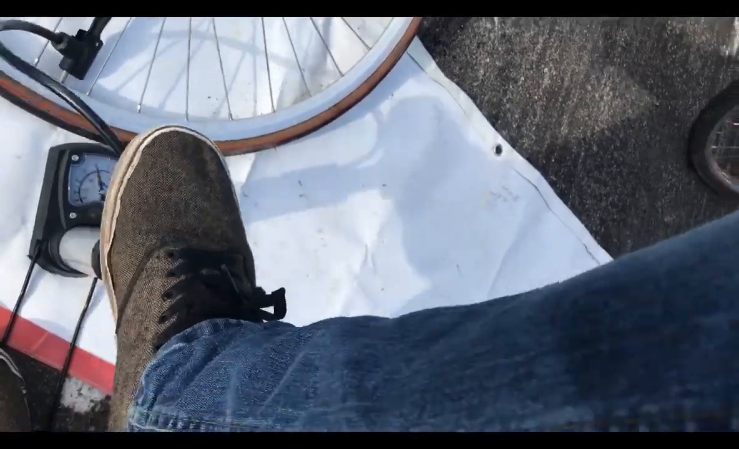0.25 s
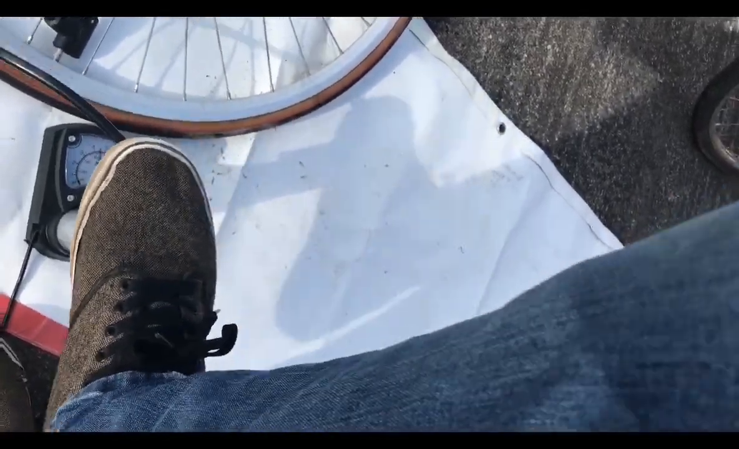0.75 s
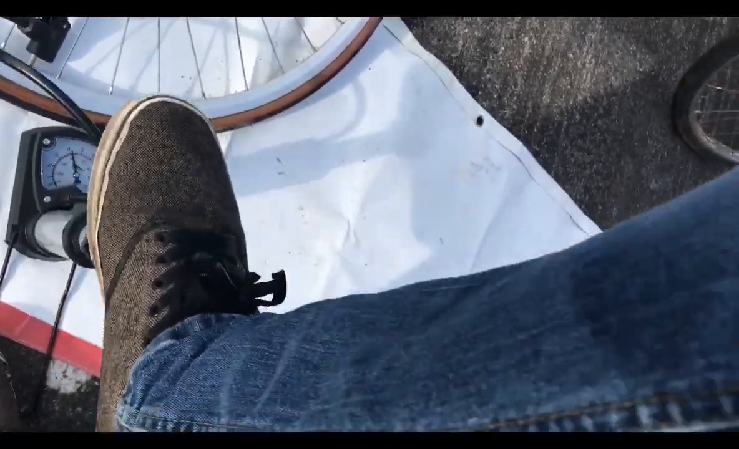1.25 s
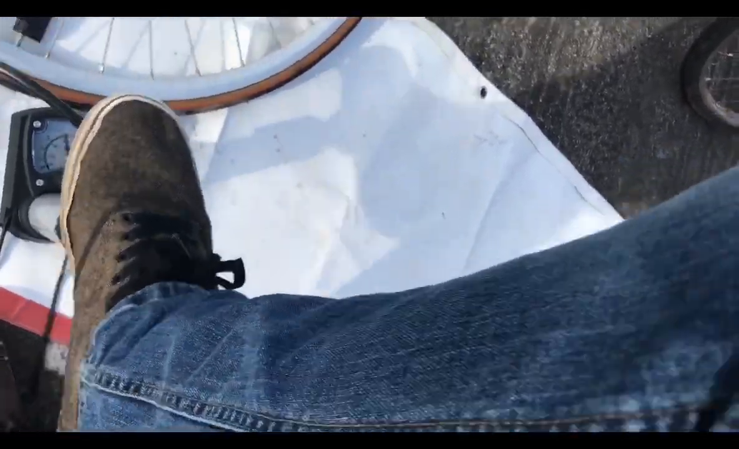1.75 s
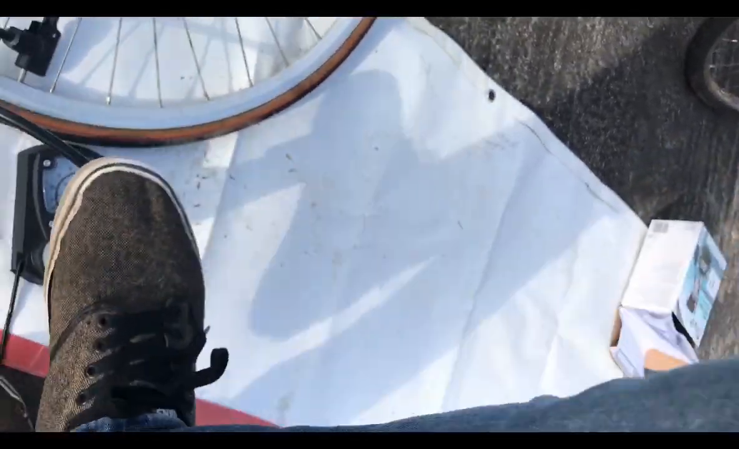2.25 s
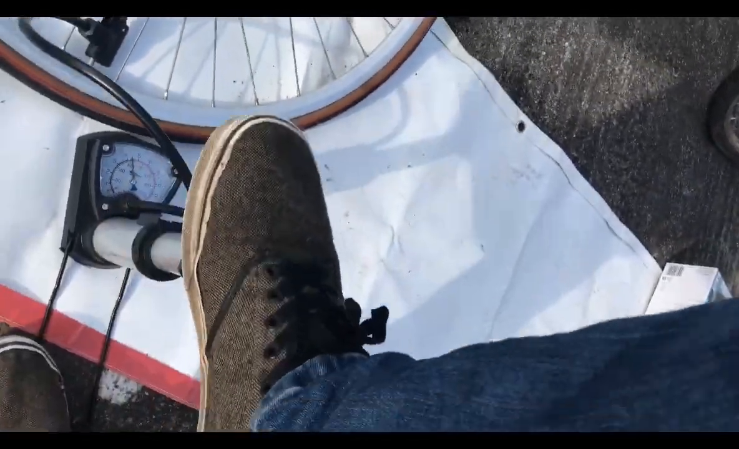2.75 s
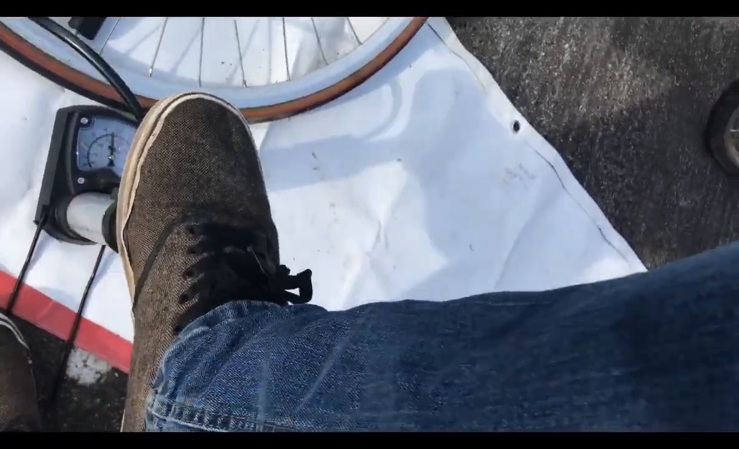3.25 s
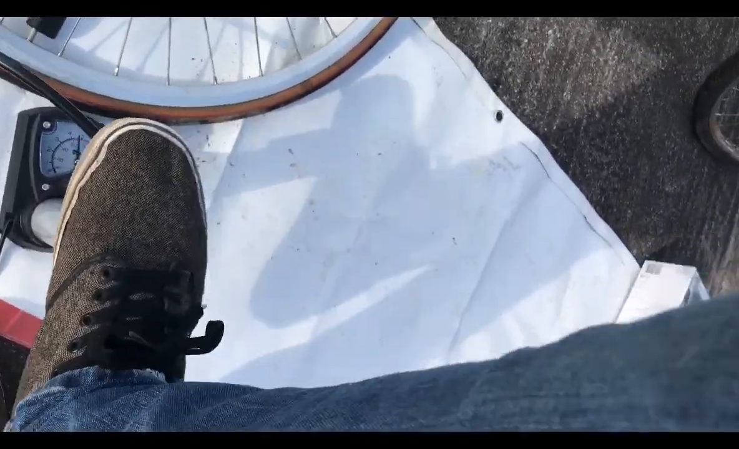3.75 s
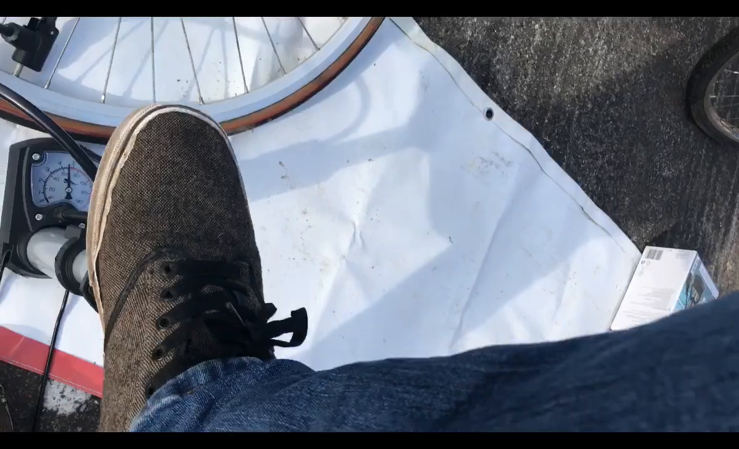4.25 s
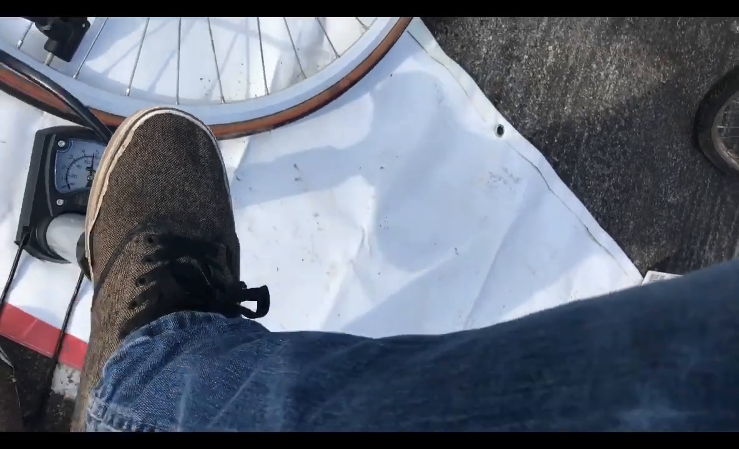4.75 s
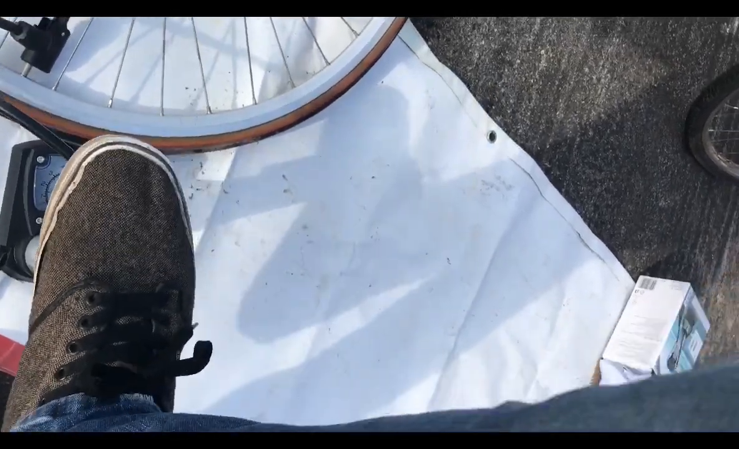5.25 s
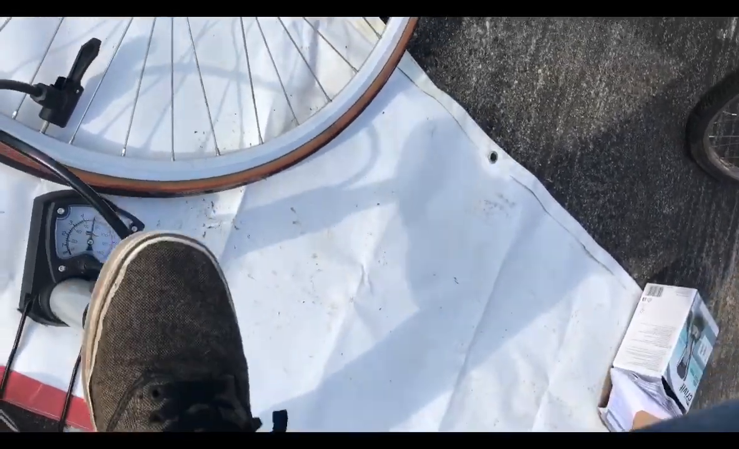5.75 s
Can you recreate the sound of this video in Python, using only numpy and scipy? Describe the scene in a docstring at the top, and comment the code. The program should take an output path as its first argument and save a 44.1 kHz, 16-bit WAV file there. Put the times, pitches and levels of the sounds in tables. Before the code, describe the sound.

A foot pump works outdoors in steady strokes, with plastic clacks, dry ticks, puffs of air and a short valve hoot ending each push.

```python
"""A faint valve hoot over low outdoor rumble comes first, then the strokes of a foot pump filling a tyre.
The linkage knocks and ticks as damped modes and shaped noise bursts, and the valve hoots as an unsteady
harmonic tone with a rasp. The base thumps as a sagging sinusoid; the air is band noise that swells with
the flow. A short wash follows the pump, and breeze and far traffic are slowly modulated noise bands."""
import sys
import numpy as np
from scipy import signal
from scipy.io import wavfile
from scipy.ndimage import uniform_filter1d

SR = 44100
rng = np.random.default_rng(int(sys.argv[2]) if len(sys.argv) > 2 else 0)


def file_out(sig):
    """Save sig as 16-bit WAV at sys.argv[1]."""
    # one column per channel
    cols = np.atleast_2d(sig).T
    # limit, then scale
    lim = np.clip(cols, -1, 1)
    pcm = np.round(lim * 32767).astype(np.int16)
    wavfile.write(sys.argv[1], SR, pcm)


N = 264600
T = np.arange(N) / SR  # time, s

# check valve hooting at the end of each downstroke, all levels relative: opening t/s, shutting t/s,
# tone level on opening/dB, tone level on shutting/dB, hiss level/dB, hose rush level/dB
VALVE_HOOTS = [(0.031, 0.05, -48.5, -57, -76, -80), (0.694, 0.715, -36.5, -28, -53, -47.5),
               (1.43, 1.471, -29, -39, -54, -46), (2.183, 2.216, -37.5, -26.5, -51.5, -45.5),
               (2.941, 2.974, -27.5, -27, -50.5, -65), (3.657, 3.704, -43.5, -30.5, -53, -50),
               (4.435, 4.473, -41, -27, -52, -47.5), (5.187, 5.212, -32.5, -42, -53.5, -42.5),
               (5.901, 5.944, -36, -25.5, -51, -49)]


def undb(db):
    """Level definition: decibels to an amplitude ratio."""
    return np.exp(np.asarray(db) * (np.log(10) / 20))


def level(x, db):
    """RMS normalisation to a level in dB."""
    return x * undb(db) / np.sqrt(np.mean(x ** 2))


def peak(x, db):
    """Peak normalisation to a level in dB."""
    return x * undb(db) / np.max(np.abs(x))


def band(x, lo_hz, hi_hz, order=2):
    """Band-pass filtering with a Butterworth response."""
    sos = signal.butter(order, [lo_hz, min(hi_hz, .45 * SR)], "band", fs=SR, output="sos")
    return signal.sosfilt(sos, x)


def walk(rate):
    """Slow random fluctuation: levels held 1 / rate s and slewed twice, with a spread near 1."""
    hold = int(SR / rate)
    steps = np.repeat(rng.standard_normal(N // hold + 1), hold)
    return 1.43 * uniform_filter1d(uniform_filter1d(steps, hold), hold)[:N]


def add(out, s, x):
    """Superposition: adds x to out from s seconds on."""
    i = max(int(s * SR), 0)
    out[i:i + len(x)] += x[:len(out) - i]


def ring(modes, chance):
    """Modal decay after a contact that grinds up for about two milliseconds, lets go and bounces once."""
    t = T[:2600]
    y = np.zeros(len(t))
    for (hz, db, t60), c in zip(modes, chance):
        decay = 1000 ** (-np.maximum(t - .002, 0) / t60)
        y += undb(db + 2 * c) * np.sin(2 * np.pi * hz * t + c) * decay
    y = y * np.minimum(t / 0.00171, 1) ** 2.66
    bounce_lag = int((0.00349 + 0.000676 * chance[7]) * SR)
    return y + 0.38 * np.concatenate([np.zeros(bounce_lag), y[:-bounce_lag]])


def knocks():
    """Modal superposition: a hollow plastic ring over the duller frame, with a rattling tail."""
    # pedal and linkage knocking on the pump body: approximate peak t/s, body peak level/dB,
    # centre of the ring f/Hz, frame level relative to the body/dB
    impacts = [(0.431, -38, 1150, 10), (0.484, -32, 810, -8), (0.5242, -32, 890, -5.5),
               (0.58, -24, 1020, -12), (0.719, -22.5, 980, -3), (0.8964, -20.5, 1142, -18),
               (0.967, -34, 980, -5.5), (1.1882, -39, 870.0, -1), (1.3226, -30.5, 716, -2),
               (1.4603, -27.5, 960, -0.5), (1.4811, -14.5, 1082, 12), (1.679, -17, 956, -16),
               (1.7455, -35, 970, -4), (1.964, -39.5, 1060, -8), (1.9768, -36, 880, 1),
               (2.1399, -40.5, 925, -10), (2.2256, -24, 888, -3), (2.2346, -40.5, 890, 12),
               (2.3745, -36, 1070, 1.5), (2.713, -37, 1280, 1.5), (2.737, -28.5, 802, -1),
               (2.855, -36.5, 910, -17), (2.874, -33, 756, -1), (2.9281, -18, 1110, -18),
               (2.9659, -26, 1130, -5), (2.9743, -32, 1080, -16), (2.9847, -24, 1160, -1),
               (3.1544, -24, 1147, -15), (3.188, -32.5, 950, -1.5), (3.366, -46, 960.0, 10),
               (3.577, -32, 916, -10), (3.6417, -45, 993, -14), (3.7072, -25, 970, -10),
               (3.7164, -32, 1050, -6), (3.734, -17.5, 1090, 0), (3.941, -34, 1266, -16),
               (4.22, -39, 1080, 8.5), (4.2944, -38.5, 845, 3), (4.31, -29.5, 1163, 4),
               (4.3131, -24, 855, -22), (4.4714, -27, 1038, 1), (4.4776, -31.5, 950, 3.5),
               (4.6626, -21, 1133, -15), (5.211, -27, 1016, -14), (5.2162, -30.5, 1120, 1.5),
               (5.2249, -38, 1130, 1), (5.4396, -31.5, 1314, 6.5), (5.66, -34.5, 900.0, -2.5),
               (5.6823, -24.5, 882, -11), (5.7944, -35, 910, 0), (5.9437, -21.5, 990, 0)]
    # modes of the hollow body: frequency ratio to the centre, relative level/dB, t60/s
    body_modes = [(1.0, 0, .014), (1.2, -6, .012), (1.75, -16, .022), (2.15, -18, .013)]
    # modes of the frame: f/Hz, relative level/dB, t60/s
    frame_modes = [(324, 1, 0.0093), (475, 2, 0.0085)]
    out, t = np.zeros(N), T[:2600]
    chances = rng.standard_normal((len(impacts), 2616))  # 16 for the modes, the rest rattle noise
    for (s, db, hz, low_db), c in zip(impacts, chances):
        body = ring([(hz * ratio, d, t60) for ratio, d, t60 in body_modes], c)
        rattle = band(c[16:] * np.minimum(t / 0.001, 1) * np.exp(-t / 0.00084), 580, 1060)
        frame_db = min(db + low_db, -13)
        frame = peak(ring(frame_modes, c[8:]), frame_db)
        add(out, s - .002, peak(body, db) + peak(rattle, db - 1) + frame)
    return out


def ticks():
    """Impulsive friction: millisecond cracks in three bands, the lowest ringing the steel spring."""
    # spring, hinge and sole slipping in dry ticks: t/s, middle-band peak level/dB,
    # low-band and high-band peak levels relative to the middle/dB
    slips = [(0.1933, -42, 3, -1), (0.235, -29.5, -17, -3), (0.429, -58, 20, 2), (0.435, -52, 15, -1),
             (0.5232, -35.5, -2.5, 2), (0.542, -31, -7, 0), (0.554, -31.5, -8, 1), (0.5653, -31, -7, 2),
             (0.5791, -36, 16, 9), (0.716, -33, 1.5, 3), (0.8947, -44.5, 15, 6), (1.187, -50, 23.5, -13),
             (1.2551, -36, -13, 1), (1.2815, -36, -7, 2), (1.3008, -25.5, -11, 3), (1.4795, -35.5, 10, 9.5),
             (1.6783, -43, 8.5, 3.5), (1.88, -46.5, 3, -1), (2.037, -39, -3.5, -1), (2.0758, -34, -18, 3),
             (2.0868, -34, -27, -8), (2.0977, -34, -23, 0), (2.2251, -33.5, 1, 0), (2.4024, -47.5, 11.5, 0),
             (2.7135, -48, 23, 4), (2.731, -51, 17.5, 9), (2.823, -35, -2, 4), (2.8444, -33.5, 3.5, 1),
             (2.852, -22.5, -10, 1.5), (2.865, -59, 20, 3), (2.926, -29.5, 9, 2), (3.1526, -45, 11, -1),
             (3.1704, -46, 14.5, 7), (3.187, -44, 10.5, 5), (3.2507, -24, -0.5, 2.5), (3.363, -57, 14, -13),
             (3.5416, -34.5, -5.5, 1), (3.567, -29.5, -8, -11), (3.5807, -27.5, -7, 9), (3.732, -35, 2, 3),
             (3.912, -50, 10, 3), (3.94, -38.5, 3, 7.5), (4.003, -25.5, -4, 5), (4.2178, -42.5, 18.5, 1),
             (4.2874, -28, -7, 3.5), (4.294, -40, 9, -5), (4.308, -26.5, 2, -20), (4.3137, -24, -19, 7),
             (4.469, -34, 2, -2), (4.6616, -34, 4.5, -6), (4.6895, -47, 9.5, -1), (4.7708, -26, 1, -0.5),
             (4.94, -55.5, 14, 3), (5.0546, -29, -16, 2), (5.064, -35, -14, -16), (5.0738, -37, -8, 2),
             (5.212, -43, 7, -2), (5.4374, -40.5, 6.5, 2), (5.6196, -42.5, 6, -10),
             (5.6552, -47.5, 18, -19), (5.6597, -43.5, 15.5, -10), (5.678, -49, 17.5, -7),
             (5.748, -29.5, -3.5, 6), (5.7813, -31, -12, 2), (5.791, -31.5, -17, -2),
             (5.8021, -32.5, -3, 3), (5.9408, -31, -1, -3)]
    faint_count, faint_db = 40, -50  # scattered at random; mean middle-band peak level, dB
    out, t = np.zeros(N), T[:1300]
    u = rng.random((faint_count, 4))
    faint_levels = faint_db + 8 * (u[:, 1] - .5)
    faint = np.c_[u[:, 0] * N / SR, faint_levels, 16 * u[:, 2] - 10, 10 * u[:, 3] - 8]
    rows = np.r_[slips, faint]
    for (s, db, low_db, high_db), c in zip(rows, rng.standard_normal((len(rows), 1300))):
        decay = np.exp(-t / 0.002) + 0.028 * np.exp(-t / 0.007)
        crack = c * np.minimum(t / 0.00055, 1) * decay
        spring = 3.5 * band(crack, 3200, 3700, order=1) + 1.2 * band(crack, 2300, 2650, order=1)
        low = peak(band(crack, 1800, 5000) + spring, db + low_db)
        middle = peak(band(crack, 4680, 8740), db)
        high = peak(band(crack, 10030, 15900), db + high_db)
        add(out, s - .0005, low + middle + high)
    return out


def valve():
    """Self-sustained oscillation: the ball flutters on the hose's note and chops the flow into a rasp."""
    # harmonics of the hoot: multiple of the fundamental, relative level/dB
    harmonics = [(1, -1), (2, -17), (3, -28), (4, -30)]
    base_hz = 875  # before bend and flutter
    rise_db_s, fall_db_s = 1150, 1498
    top_bend = 0.033  # share by which the note has risen when the valve shuts
    gain, bend = np.zeros(N), np.zeros(N)
    for on, off, on_db, off_db, *_ in VALVE_HOOTS:
        held_db = np.interp(T, [on, off], [on_db, off_db])
        onset_loss_db = rise_db_s * np.maximum(on - T, 0)
        release_loss_db = fall_db_s * np.maximum(T - off, 0)
        gain += undb(held_db - onset_loss_db - release_loss_db)
        bend += np.interp(T, [on, off, off + .05], [0, top_bend, 0])
    phase = 2 * np.pi * np.cumsum(base_hz * (1 + bend + 0.027 * walk(150))) / SR
    tone = level(sum(undb(db + 2.2 * walk(220)) * np.sin(k * phase) for k, db in harmonics), 0)
    cavity = band(rng.standard_normal(N), 920, 1250, order=1) * undb(4 * walk(200))
    rasp = band(rng.standard_normal(N) * (1 + np.sin(phase)) ** 2, 1100, 4900, order=1)
    wobble = undb(1.5 * walk(90))
    hoot = tone + level(cavity, -8) + level(rasp, -26.5)
    return hoot * wobble * uniform_filter1d(gain, size=150)


def thumps():
    """Heavily damped oscillation: the base plate swings once or twice, sagging in pitch."""
    # base rocking onto the ground: start t/s, peak level/dB, nominal f/Hz before the glide
    landings = [(0.191, -28, 116), (0.942, -32, 112), (1.184, -33, 97), (1.719, -28, 128),
                (2.387, -34.5, 116), (3.18, -29, 113), (3.715, -36, 105), (3.937, -34.5, 113),
                (4.708, -33.5, 101), (5.439, -32.5, 113)]
    out, t = np.zeros(N), T[:3000]
    for s, db, hz in landings:
        glide = np.sin(2 * np.pi * hz * (1.25 * t - 12 * t ** 2))
        swing = glide * (t / .004) ** 2 * np.exp(-t / .004)
        add(out, s, peak(swing, db))
    return out


def swell(s, db, rise_db_s, fall_db_s, round_s=0):
    """Exponential growth and decay of power around s, steady in dB per s away from a rounded top."""
    away = np.hypot(T - s, round_s) - round_s
    return undb(db - np.where(T < s, rise_db_s, fall_db_s) * away) ** 2


def flow():
    """Incoherent addition: powers of hiss, seal noise and hose rush sum over intakes, drags and hoots."""
    # rising piston drawing air, levels relative: fastest flow t/s, hiss level/dB,
    # hose rush level/dB, swell rate/dB per s
    intakes = [(0.247, -45, -47.5, 292), (1.011, -45, -51.5, 222), (1.778, -45, -51.5, 256),
               (2.497, -49.5, -54.5, 113), (3.246, -46, -51, 290), (4.003, -47, -50, 264),
               (4.771, -45.5, -53.5, 230), (5.504, -45.5, -52.5, 245)]
    # seal dragging as the foot pushes, twice a stroke, levels relative: t/s, hiss level/dB,
    # seal noise level relative to the hiss/dB, hose rush level/dB
    drags = [(0.465, -55, 0, -47.5), (.573, -68, -8, -52.5), (1.203, -56, -1, -47.5),
             (1.3, -60.5, -0.5, -48.5), (1.979, -58, -8, -47.5), (2.1, -68, 7.5, -48.5),
             (2.724, -56, 0, -51), (2.856, -66.5, 8, -47), (3.412, -60.5, -4.5, -52.5),
             (3.574, -56, -1, -44.5), (4.226, -53.5, -2, -47), (4.306, -68, -5, -46),
             (4.937, -60.5, -18, -46.5), (5.07, -60, -2, -48), (5.671, -57.5, -15, -43.5),
             (5.794, -67.5, 8, -66)]
    intake_fall_db_s, intake_low_db, intake_round_s = 341, -5, 0.024
    rush_share = 0.26  # the intake rush swells and fades by this share of the hiss's dB
    drag_rise_db_s, drag_fall_db_s, drag_rush_fall_db_s = 895, 96, 178
    # hiss building with the pressure, gone after the valve shuts
    leak_rise_db_s, leak_fall_db_s, leak_low_db = 146, 451, -3.5
    seep_db, seep_fall_db_s = -27.5, 32  # a little air seeps on; level relative to the leak
    # relative floors between the strokes
    hiss = low = undb(-83) ** 2
    rush = undb(-65) ** 2
    for s, db, rush_db, rise in intakes:
        part = swell(s, db, rise, intake_fall_db_s, intake_round_s)
        hiss, low = hiss + part, low + part * undb(2 * intake_low_db)
        rush = rush + swell(s, rush_db, rush_share * rise, rush_share * intake_fall_db_s)
    for s, db, low_db, rush_db in drags:
        part = swell(s, db, drag_rise_db_s, drag_fall_db_s)
        hiss, low = hiss + part, low + part * undb(2 * low_db)
        rush = rush + swell(s, rush_db, drag_rise_db_s, drag_rush_fall_db_s)
    for _, off, _, _, db, rush_db in VALVE_HOOTS:
        leak = swell(off, db, leak_rise_db_s, leak_fall_db_s)
        part = leak + swell(off, db + seep_db, leak_fall_db_s, seep_fall_db_s)
        hiss, low = hiss + part, low + part * undb(2 * leak_low_db)
        rush = rush + swell(off, rush_db, leak_rise_db_s, leak_fall_db_s)
    return hiss, low, rush


def air():
    """Turbulence noise: hiss that brightens with the flow, gritty seal noise and the tube's hollow rush."""
    # bands of the hiss: lower f/Hz, upper f/Hz, relative level/dB
    hiss_bands = [(5560, 7100, -3.5), (8200, 10130, -1.5), (10970, 13500, 1), (13400, 16400, 0.5)]
    hiss_db, low_db, tube_db = (uniform_filter1d(10 * np.log10(p), size=700) for p in flow())
    bright_db = .075 * (hiss_db + 50)  # extra tilt per band
    top = np.zeros(N)
    for k, (lo, hi, db) in enumerate(hiss_bands):
        top += level(band(rng.standard_normal(N), lo, hi), db) * undb(1.3 * walk(30) + k * bright_db)
    # the seal and hinge slip in tiny cracks, about 250 a second, a few much larger than the rest
    grit = (rng.random(N) < 250 / SR) * undb(4 * np.minimum(rng.exponential(size=N), 3))
    grit = np.convolve(grit, np.exp(-T[:300] / .0012))[:N] * rng.standard_normal(N)
    seal = level(band(rng.standard_normal(N), 1700, 4700) * undb(2.0 * walk(70)), 0)
    seal = seal + level(band(grit, 1800, 7000), -6)
    flutter = undb(2.2 * walk(130))
    tube = band(rng.standard_normal(N), 523, 1160, order=1) * undb(3.1 * walk(60))
    hiss = undb(hiss_db) * 0.72 * top * flutter
    return hiss + seal * undb(low_db) + level(tube, 0) * undb(tube_db)


def reflections(pump):
    """Diffuse reflection: nearby ground and walls return a short dull wash, as convolution with noise."""
    tail = band(rng.standard_normal(6000), 180, 4700, order=1) * 1000 ** (-T[:6000] / 0.3)  # t60 0.3 s
    tail = tail / np.sqrt(np.sum(tail ** 2))
    return undb(-23.5) * signal.fftconvolve(pump, tail)[:N]


def breeze():
    """Wind turbulence: low band noise rumbles in gusts."""
    # breeze buffeting the microphone: t/s, level before gusting/dB
    wind = [(0, -47.5), (1.5, -49.5), (2.7, -50), (3.4, -46), (4.499, -49.5), (6, -48.5)]
    s, db = np.transpose(wind)
    gusts = band(rng.standard_normal(N), 36, 90) * undb(3.5 * walk(14))
    return level(gusts, 0) * undb(np.interp(T, s, db))


def town():
    """Spectral shaping: far traffic as noise in half-octave steps, the bass flickering most."""
    # spectrum of far traffic: f/Hz, relative spectral density level/dB per Hz
    spectrum = [(59, -31), (100, -5.5), (335, -7), (492, -42), (872, -10.5), (1550, -22), (1650, -24),
                (7610, -39.5), (13200, -29), (16000, -36)]
    table_hz, table_db = np.transpose(spectrum)
    out = 0
    for hz in 120 * 2 ** np.arange(0, 7.1, .5):
        db = np.interp(np.log(hz), np.log(table_hz), table_db) + 10 * np.log10(hz)
        flicker_db = 3.5 * walk(9) / (1 + hz / 400)
        noise = level(band(rng.standard_normal(N), hz / 1.314, hz * 1.192), 0)
        out = out + undb(db + flicker_db) * noise
    return level(out, -54)


def scene():
    """Superposition of the pump, its reflections, the air and the outdoor background."""
    pump = knocks() + ticks() + valve()
    return (pump + reflections(pump) + thumps() + air() + breeze() + town())[None]


def record(dry):
    """Low-pass filtering: the phone cuts the top above 15.85 kHz with a steep elliptic response."""
    return signal.sosfilt(signal.ellip(10, .2, 60, 15850, fs=SR, output="sos"), dry)


dry = scene()
out = record(dry)
file_out(out)
```